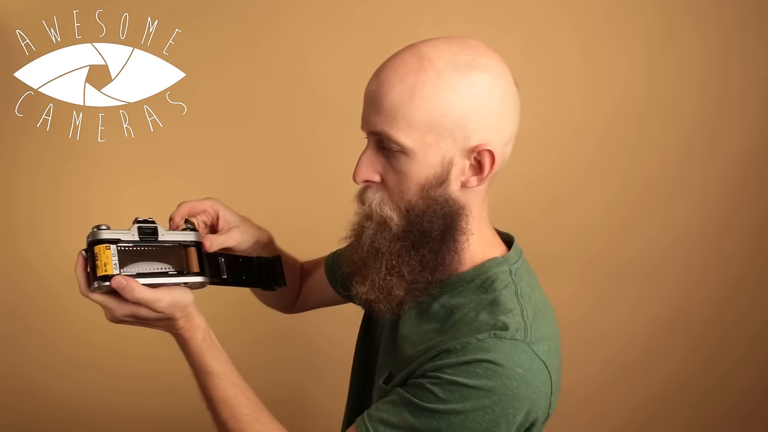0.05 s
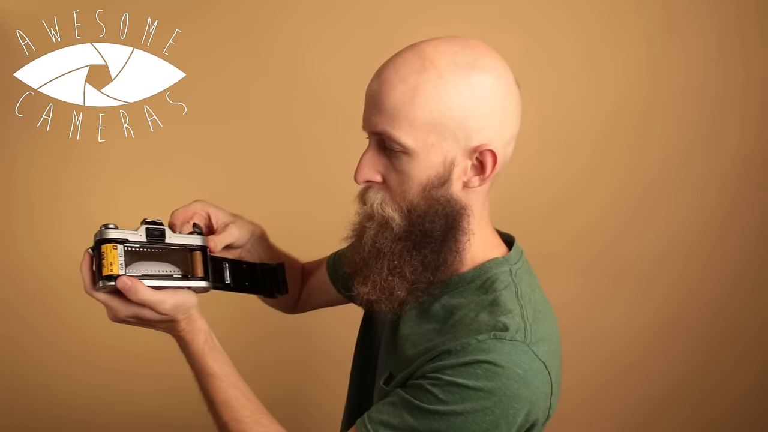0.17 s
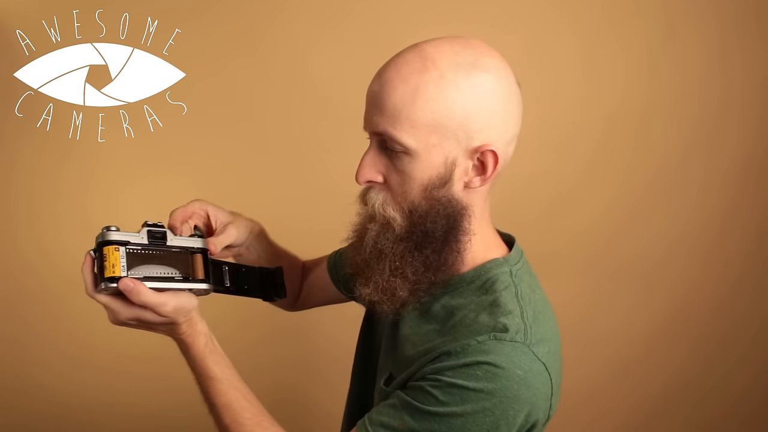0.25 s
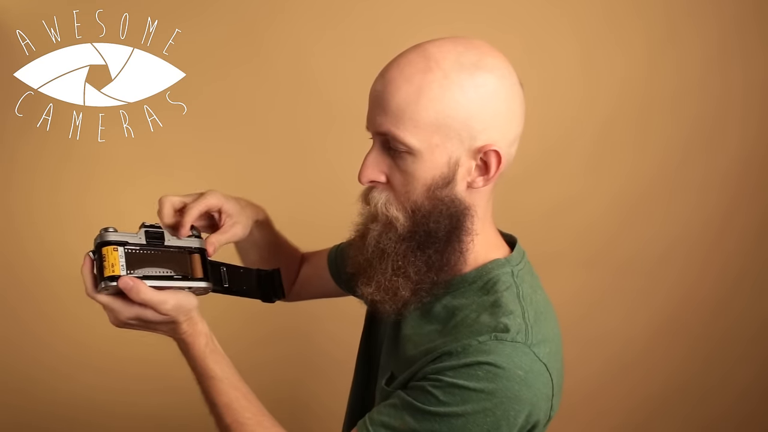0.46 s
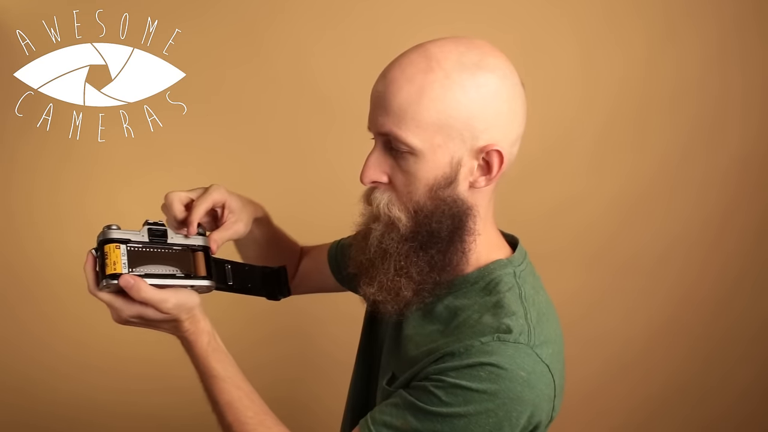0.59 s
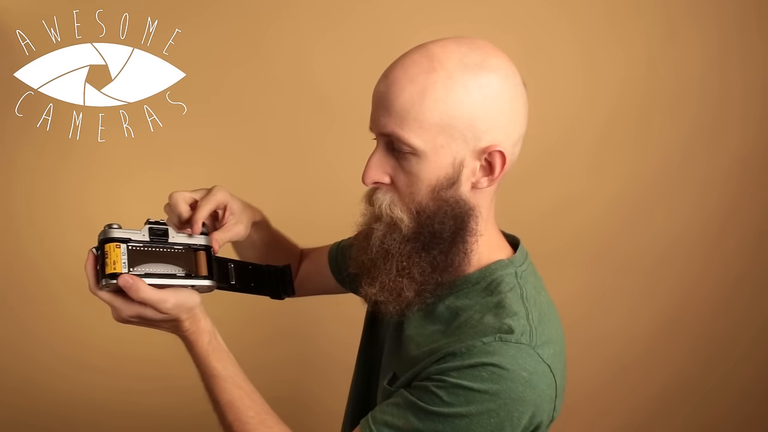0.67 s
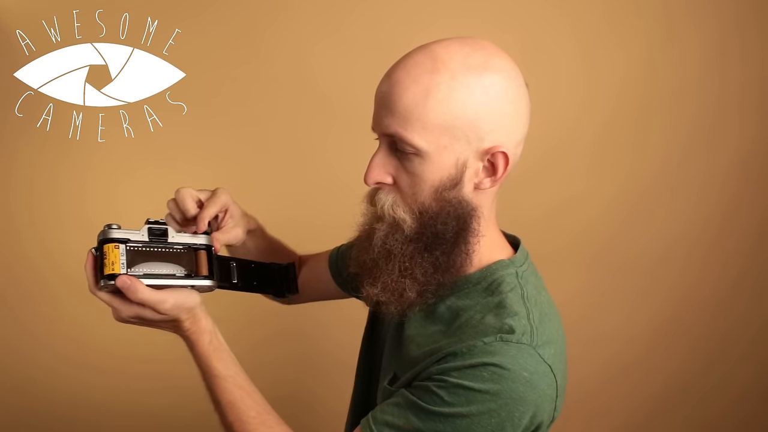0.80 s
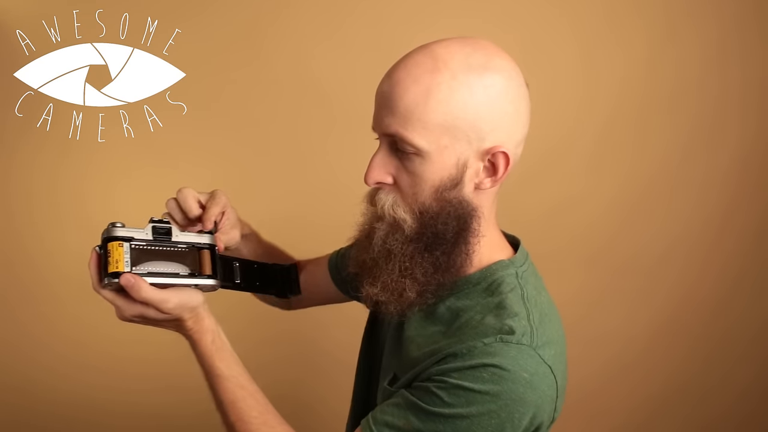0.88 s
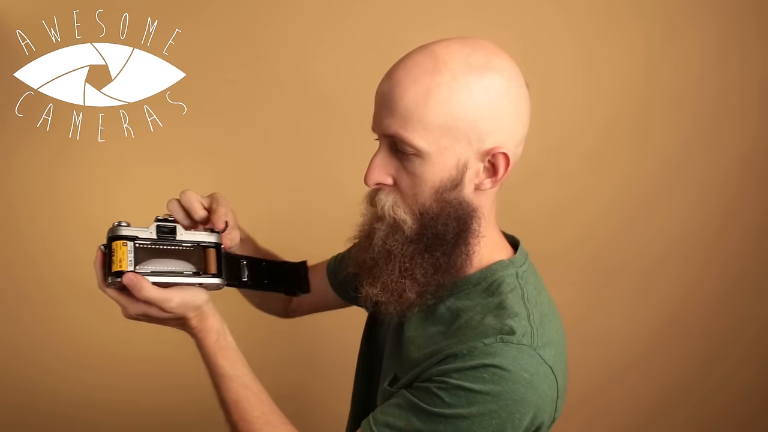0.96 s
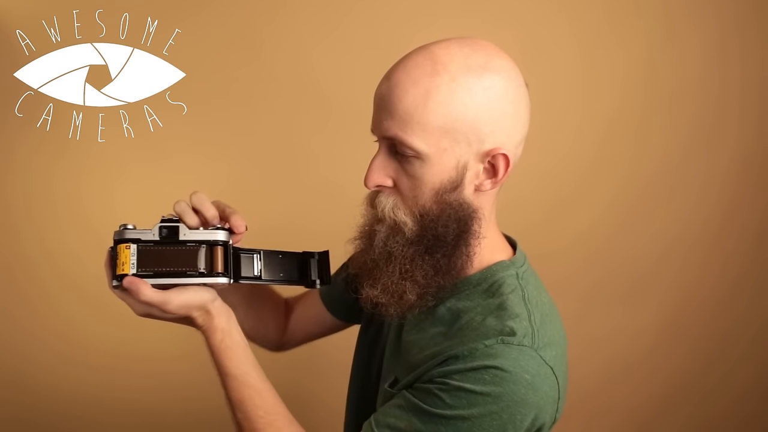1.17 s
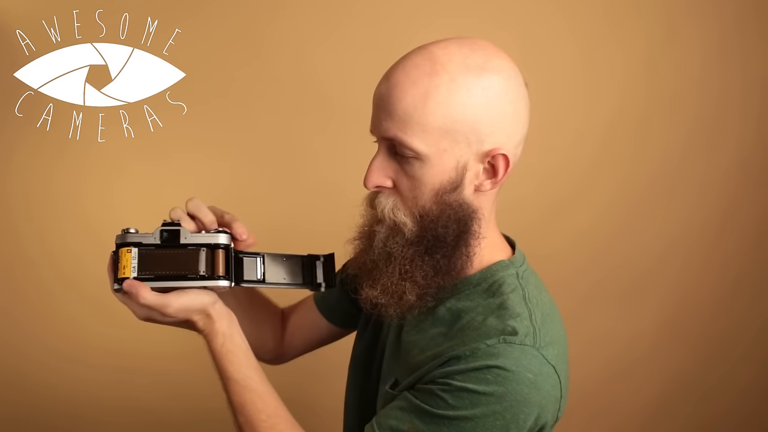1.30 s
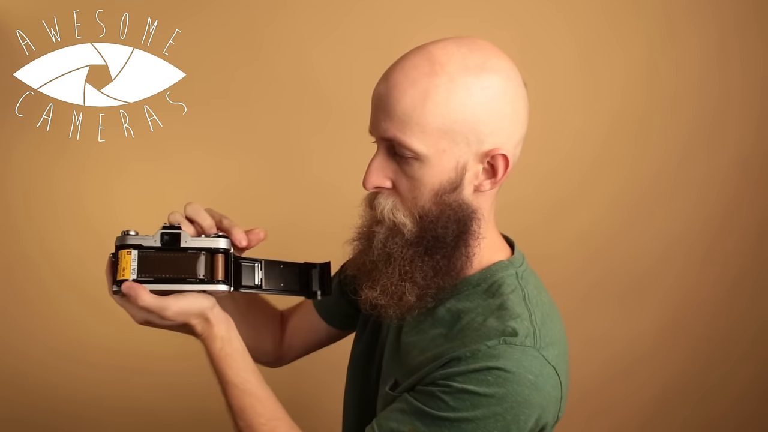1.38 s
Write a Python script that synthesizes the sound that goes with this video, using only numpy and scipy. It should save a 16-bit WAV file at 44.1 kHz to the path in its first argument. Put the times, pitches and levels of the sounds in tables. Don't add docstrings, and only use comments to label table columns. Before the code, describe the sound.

Close, dry view of a metal camera worked by hand; one loud double-edged shutter clack, small settling ticks, then softer winding clicks and gritty scraping, with short room reflections and very faint air hiss.

```python
import sys
import numpy as np
from scipy import signal
from scipy.fft import rfft, irfft, next_fast_len
from scipy.io import wavfile
from scipy.ndimage import uniform_filter1d

SR = 44100
rng = np.random.default_rng(int(sys.argv[2]) if len(sys.argv) > 2 else 0)


def generate_wav(sig):
    pcm = np.round(np.clip(np.atleast_2d(sig).T, -1, 1) * 32767).astype(np.int16)
    wavfile.write(sys.argv[1], SR, pcm)


def ratio(d):
    e = np.asarray(d, float) / 20
    return 10 ** e


N = 63945

# pitch in Hz, width in Hz, level in dB.
TOP_PLATE = [(4666, 780, -8), (5148, 400, -1), (5970, 890, -15.5)]
SHELL = [(3292, 310, -2), (3650, 660, 0.5)]
SMALL_SPRINGS = [(7070, 813, -2.5), (8200, 270, -1.5), (9090, 610, -4), (10870, 830, -4),
                 (12120, 580, -1.5), (14300, 2400, -12.5)]
HOLLOW_BODY = [(863, 31, -3.5), (1034, 77, 6), (1440, 200, 2), (1875, 57, 2)]
BACK_DOOR = [(2040, 754, -3.5), (2970, 610, 4)]


def unit(x):
    return x / np.sqrt(np.mean(x ** 2) + 1e-20)


def along(points, hz):
    f, value = np.transpose(points)
    return np.interp(np.log(hz + 1), np.log(f + 1), value)


def filtered(x, response):
    n = x.shape[-1]
    padded = next_fast_len(n + 8192)
    spectrum = rfft(x, padded) * response(np.fft.rfftfreq(padded, 1 / SR))
    return irfft(spectrum, padded)[..., :n]


def hush():
    # frequency in Hz, level in dB per Hz.
    air_shape = [(15, -30.5), (30, -19), (60, -7.5), (190, -10), (300, -16.5), (800, -15.5), (1200, -20),
                 (3000, -26.5), (16000, -27.5)]
    side_shape = [(15, -38), (40, -12), (400, -15.5), (3000, -11.5), (16000, -13)]
    # hum frequency in Hz, level in dB.
    hum_tones = [(59, -82), (81, -86), (193, -86)]
    air_db, side_db = -70.5, -0.5
    t = np.arange(N) / SR
    air = unit(filtered(rng.standard_normal(N), lambda hz: ratio(along(air_shape, hz))))
    hiss = unit(filtered(rng.standard_normal(N), lambda hz: ratio(along(side_shape, hz))))
    hum = np.zeros(N)
    for hz, db in hum_tones:
        hum += ratio(db) * np.sqrt(2) * np.sin(2 * np.pi * (hz * t + rng.random()))
    return np.array([ratio(air_db) * air + hum, ratio(air_db + side_db) * hiss])


def room(x):
    # frequency in Hz, time to fall by 60 dB in seconds.
    fade_times = [(400, 0.11), (1000, 0.53), (3500, 0.31), (5200, 0.3), (10000, 0.32), (15000, 0.2)]
    room_db, side_db, first_wall_s = -7.5, -38, 0.003
    late_db, late_fade_s = -30, 1.77
    wet, step = np.zeros((2, N + 2 * SR)), SR // 25
    for start in range(0, N, step):
        hz, t, z = signal.stft(rng.standard_normal((2, SR * 4 // 5)), SR, nperseg=256)
        early = ratio(-60 * t / along(fade_times, hz)[:, None])
        late = ratio(late_db - 60 * t / late_fade_s)
        tail = signal.istft(z * (early + late), SR, nperseg=256)[1]
        tail = tail / np.linalg.norm(tail[0])
        echo = signal.fftconvolve(x[None, start:start + step], tail, axes=1)
        wet[:, start + round(first_wall_s * SR):][:, :echo.shape[1]] += echo
    return ratio([[room_db], [room_db + side_db]]) * wet[:, :N]


def ringing(pushes, peaks):
    spot_db = 1.5 * rng.standard_normal((len(pushes), len(peaks), 1))

    def response(f):
        h = 0
        for k, (center, width, db) in enumerate(peaks):
            resonance = 1j * f * width / (center * center - f * f + 1j * f * width)
            h = h + (-1) ** k * ratio(db + spot_db[:, k]) * resonance
        below = 1j * f / (0.81 * peaks[0][0])
        above = 1j * f / (1.71 * peaks[-1][0])
        low_edge = below ** 2 / (1 + 1.4 * below + below ** 2)
        high_edge = 1 / (1 + 1.4 * above + above ** 2)
        return h * (low_edge * high_edge) ** 2
    return filtered(pushes, response)


def evened(bursts, shape):
    for _ in range(3):
        z = rfft(bursts)
        flat = irfft(z / (np.abs(z) + 1e-9), bursts.shape[1])
        loudness = np.sqrt(np.abs(uniform_filter1d(flat ** 2, size=31)))
        bursts = flat / (loudness + 1e-9) * shape
    return bursts


def contacts(s, db, length_ms, peaks):
    rise_ms, fall_sharpness, grit_db = 0.15, 2.5, 2
    out, ms = np.zeros(N + SR), np.arange(SR // 12) * 1000 / SR
    shape = np.clip(ms / rise_ms, 0, 1) * np.exp(-(ms / length_ms[:, None]) ** fall_sharpness)
    grit = np.sign(rng.standard_normal(shape.shape)) * ratio(grit_db * rng.standard_normal(shape.shape))
    rings = ringing(evened(shape * grit, shape), peaks)
    rings *= np.linalg.norm(shape, axis=1, keepdims=True) / np.linalg.norm(rings, axis=1, keepdims=True)
    for at, gain, ring in zip(s, ratio(db), rings):
        out[round(at * SR):][:len(ms)] += gain * ring
    return out[:N]


def struck_metal(rows):
    s, db, shell_db, spring_db, ms = np.transpose(rows)
    plate = contacts(s, db, ms, TOP_PLATE)
    shell = contacts(s, db + shell_db, ms, SHELL)
    return plate + shell + contacts(s, db + spring_db, ms, SMALL_SPRINGS)


def palm():
    # pitch in Hz, width in Hz, level in dB.
    palm_peaks = [(318, 40, 1), (543, 85, -5)]
    # start in seconds, level in dB, length in ms.
    knocks = [
        (1.354, -57.5, 3.03),
        (1.364, -58, 4),
    ]
    return contacts(*np.transpose(knocks), palm_peaks)


def settling():
    # start in seconds, plate level in dB, shell and springs in dB over the plate, length in ms.
    shifts = [
        (.16, -73, -1, 2, 1.25),
        (0.432, -48, -2, -11.5, 1.5),
        (.443, -43.5, 0, -17, 1.8),
        (.466, -70.5, -7, -18.5, 0.93),
        (0.69, -72.5, 10, 0.5, 0.47),
        (0.7, -71, 5, -11, 0.85),
        (0.782, -64.5, 3, -11.5, 35),
        (1.255, -55, 1, -25.5, 0.62),
    ]
    return struck_metal(shifts)


def door():
    # start in seconds, level in dB, length in ms.
    knocks = [(0.1899, -46.5, 4), (.196, -51.5, 17.3), (0.2204, -25, 2.2), (0.2238, -22.5, 2.6),
              (0.227, -37.5, 5.4), (0.2473, -26, 2), (0.254, -29, 5.7), (0.2652, -29.5, 4.4),
              (0.282, -27.5, 3), (0.2977, -34.5, 0.78), (0.3197, -24.5, 2.3), (0.399, -46, 11),
              (0.597, -52.5, 1.9), (.69, -58, .6), (0.698, -53.5, 0.72), (0.7799, -43.5, 0.73),
              (0.8125, -42.5, 4), (0.8226, -40.5, 2.7), (1.0053, -59, 2.4), (1.021, -50, 0.75),
              (1.095, -56, 3.1), (1.102, -45.5, 4.3), (1.1665, -29, 0.23), (1.176, -46.5, 6.5),
              (1.1831, -41.5, .7), (1.2458, -39.5, 0.41), (1.255, -57, 0.47), (1.2948, -43, .6),
              (1.331, -46, 4.9), (1.3415, -40.5, 3), (1.357, -34, 3), (1.362, -41.5, 9.8), (1.368, -44, 5),
              (1.375, -49.5, 6.8)]
    return contacts(*np.transpose(knocks), BACK_DOOR)


def thuds():
    # start in seconds, level in dB, deep part in dB over it, length in ms.
    blows = [(0.1917, -62, -33, 13), (0.2201, -29.5, -22, 2.83), (.23, -37.5, -32, 14.3),
             (0.248, -30.5, -42, 1.5), (0.265, -42, -8, 4.3), (.282, -35.5, -9.5, 3),
             (0.302, -36, -31, 1.03), (0.318, -23.5, -3, 1.5), (.404, -66, -18, 4.9),
             (0.5763, -56.5, -3.5, 5.9), (0.815, -55, -31, 7.9), (1.105, -64, -2.5, 43),
             (1.177, -64, -4, 12.7), (1.342, -51.5, -7.5, 8.4), (1.354, -44.5, -6, 4),
             (1.367, -58, -23, 20)]
    # pitch in Hz, width in Hz, level in dB.
    deep_peaks = [(330, 60, -21), (427, 50, -7.5), (670.4, 63, 1.5), (859, 120, 5.5)]
    s, db, deep_db, ms = np.transpose(blows)
    return contacts(s, db, ms, HOLLOW_BODY) + contacts(s, db + deep_db, ms, deep_peaks)


def scrape():
    # time in seconds, plate level in dB, springs in dB over it.
    pressure = [(.9, -110.5, -25), (.975, -64, -16), (1.0, -64.5, -11), (1.044, -58.5, -12),
                (1.055, -54, -18.5), (1.072, -51.5, -12), (1.086, -61, -17), (1.094, -49.5, -7),
                (1.124, -46.5, -11.5), (1.14, -51.5, -16), (1.16, -61.5, -15), (1.177, -47.5, -14),
                (1.195, -65.5, -7.5), (1.3, -65.5, -9.5), (1.33, -51.5, -10), (1.36, -44, 0.5),
                (1.383, -58, -30.5), (1.45, -97, -2)]
    slips_per_s, scatter_db = 4000, 4
    s, db, spring_db = np.transpose(pressure)
    slips = (rng.random(N) < slips_per_s / SR) * ratio(scatter_db * rng.standard_normal(N))
    slips = np.convolve(slips, np.exp(-np.arange(120) / 10))[:N]

    def part(level_db, peaks):
        level = ratio(np.interp(np.arange(N) / SR, s, level_db))
        return level * unit(ringing(slips * rng.standard_normal((1, N)), peaks)[0])

    outer = part(db, TOP_PLATE) + part(db - 5.5, SHELL) + part(db - 4.5, BACK_DOOR)
    return outer + part(db - 21.5, HOLLOW_BODY) + part(db + spring_db, SMALL_SPRINGS)


def winding():
    # start in seconds, plate level in dB, shell and springs in dB over the plate, length in ms.
    ratchet = [(0.7798, -44, 3.5, -27, 0.84), (.801, -52, -2, -16, 2.1), (0.8058, -50.5, -2, -7.5, 14),
               (.8135, -38.5, 0.5, -6, 4.8), (0.8155, -46, 13.5, -9, 4), (.8232, -38.5, -3, 3.5, 0.84),
               (.825, -43, -14, -10, 5), (1.0047, -56, 4, -14, 5.4), (1.021, -45, -4, -6.5, 1.34),
               (1.059, -55, -8, -7, 1.4), (1.102, -40.5, -10, -2, 1.6), (1.106, -40.5, -6, -8.5, 2.3),
               (1.1132, -35.5, -2, -4, .4), (1.1666, -32, -3, -16, 0.25), (1.1825, -48, 0, -12, 0.59),
               (1.2115, -58.5, -20, 8, 0.48), (1.2462, -50, 11, -8, 0.24), (1.2948, -54, 4, -18, 0.76),
               (1.318, -37, -21, -9, 2.1), (1.3325, -38, -3, -29, 1.2), (1.3415, -30.5, -8, -6, 1.4),
               (1.355, -42.5, -5, 4, 0.96), (1.3568, -34.5, -5, -4.5, 2.92), (1.3676, -33, -21, -12.5, 2.5)]
    teeth = [(1.039, -67, 15, -18, 8), (1.066, -50, -4, -17, 2.1), (1.072, -49.5, 3.5, -15.5, 2.7),
             (1.081, -52, -6, -15, 2.6), (1.092, -46, -6, -9.5, 2.4), (1.097, -43.5, -7, -5, 2),
             (1.116, -39.5, -9, -2.5, 1.2), (1.119, -46.5, 6, -3.5, 2.6), (1.1227, -43, 1, -5.5, 2),
             (1.126, -46.5, 3, -11, 3.5), (1.136, -51, -7, -9.5, 3.3), (1.171, -48, -7, -10.5, 1.3),
             (1.185, -51.5, -11, -11, 2), (1.339, -45, -1, -14.5, 3), (1.3609, -40, 1, -10.5, 2),
             (1.378, -51, -2, -10.5, 2.1), (.2295, -29.5, -3.5, -0.5, 3.2), (.233, -33, -1.5, 0, 3.1),
             (0.841, -59, -4, -11, 2.5), (.857, -59.5, 1, -26, 38), (0.41, -56, 5.5, -15, 25)]
    return struck_metal(ratchet) + struck_metal(teeth)


def shutter():
    # start in seconds, plate level in dB, shell and springs in dB over the plate, length in ms.
    slams = [(0.0224, -66.5, -8.5, 4.5, 2.7), (0.1902, -50, -1, -18, 4.2), (0.196, -56, -3.5, -9.5, 16),
             (0.2196, -30.5, 0, -2, 0.83), (.2216, -18.5, 4.5, 0.5, 0.87), (0.223, -7, -7.5, -13.5, 1.6),
             (0.228, -35, 0, 0.5, 4.6), (0.2481, -21.5, 3.5, -8.5, 2.3), (0.2527, -27.5, 0, 1, 2.4),
             (0.256, -28.5, 0, -3.5, 1.1), (0.263, -23.5, -13, -4.5, 1.7), (0.2655, -18, -18.5, -9, 3.2),
             (0.275, -25, -9, -15, 1.7), (.2806, -21.5, -8.5, -7, 2.2), (0.2901, -29.5, -1, -3, 0.91),
             (0.3005, -18.5, -7, -20.5, 0.72), (.3172, -20, -9, -7.5, 2.2),
             (.3207, -18.5, -8.5, -10.5, 2.4), (.315, -36.5, -3.5, -3.5, 4.2), (.396, -38, 1.5, -28, 2.1),
             (0.4032, -33.5, -6, -7.5, 2), (0.406, -40, -4, -4, 6), (0.4955, -49, -18.5, -9.5, 2.9),
             (0.5755, -62.5, 0, 3.5, 1.9), (0.5971, -55.5, -5, 5, 1.5)]
    return struck_metal(slams)


def camera():
    return palm() + settling() + door() + thuds() + scrape() + winding() + shutter()


def scene():
    direct = camera()
    mid, side = room(direct) + hush()
    return np.array([direct + mid + side, direct + mid - side])


def band_limit(x):
    return signal.sosfilt(signal.butter(12, 16800, fs=SR, output="sos"), x)


def record(dry):
    top_hz = 15900
    mix = filtered(dry, lambda hz: hz < top_hz)
    return band_limit(mix)


dry = scene()
out = record(dry)
generate_wav(out)
```